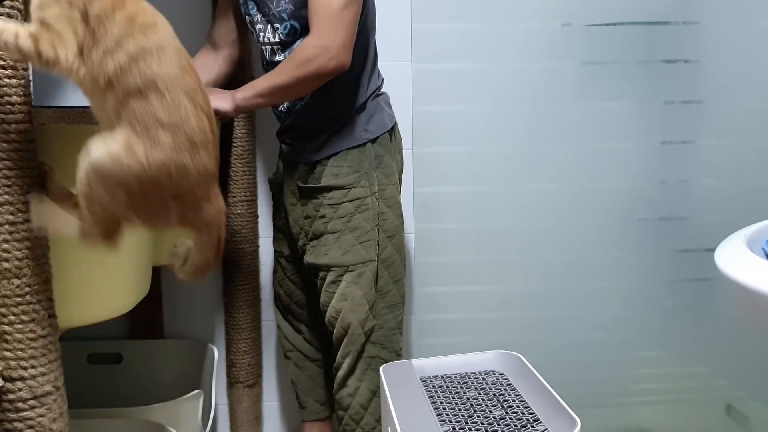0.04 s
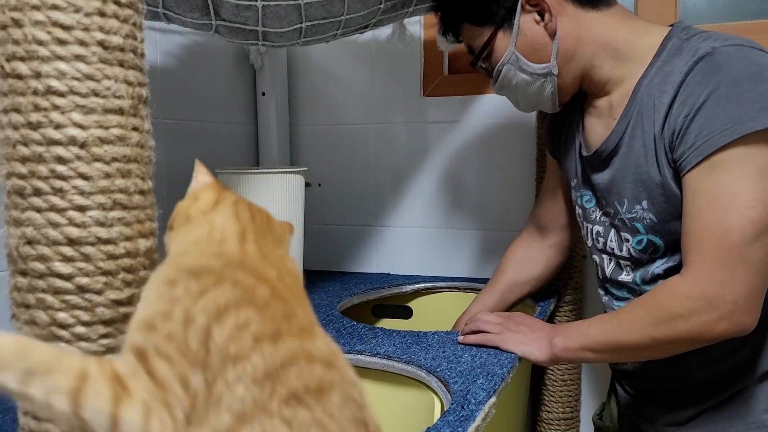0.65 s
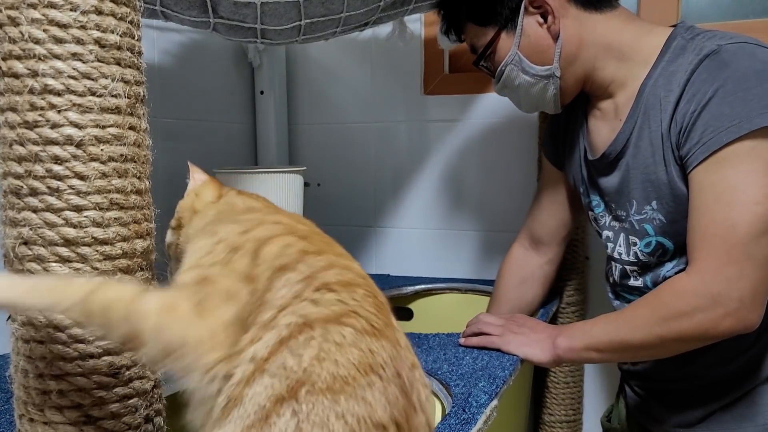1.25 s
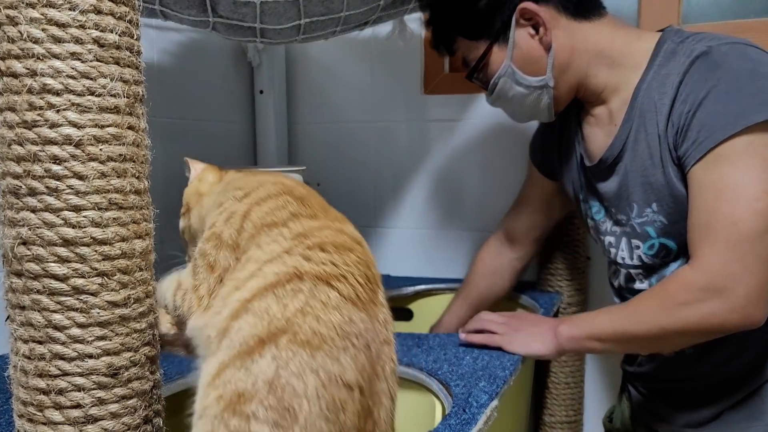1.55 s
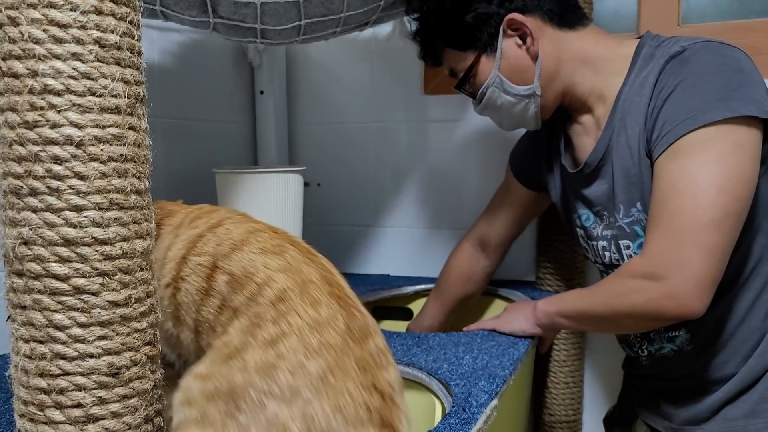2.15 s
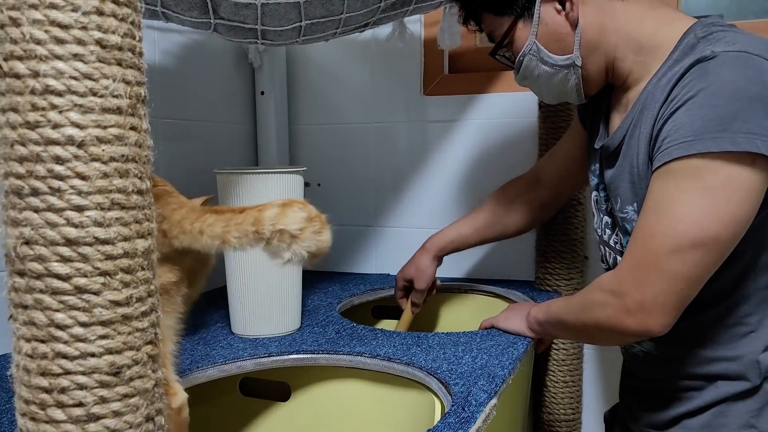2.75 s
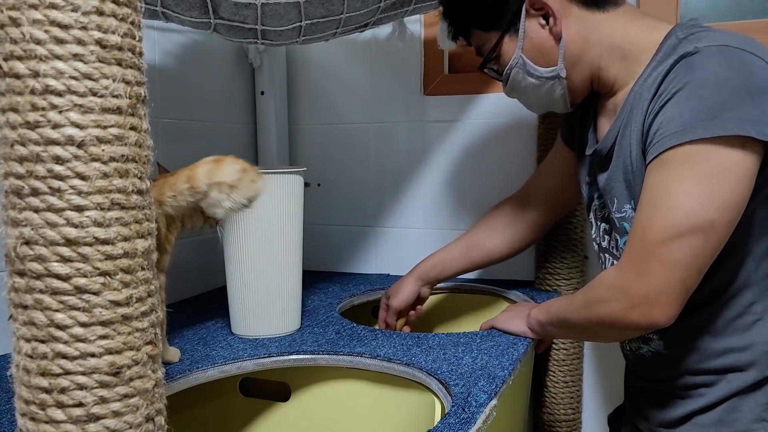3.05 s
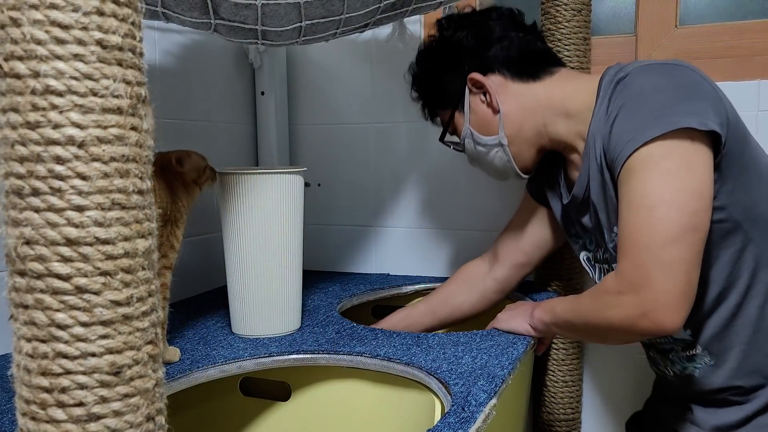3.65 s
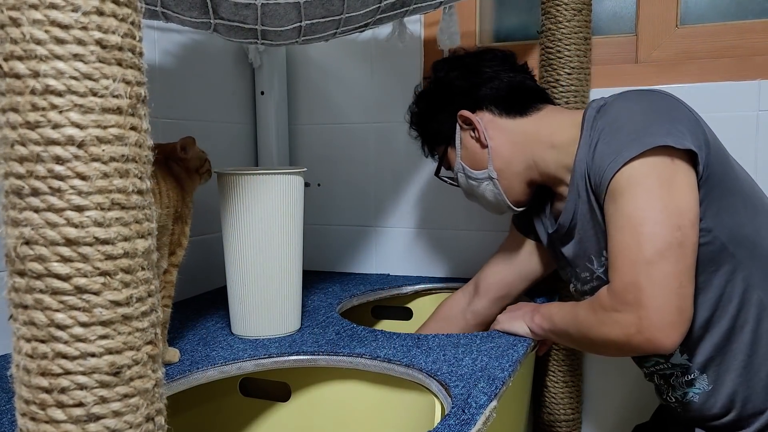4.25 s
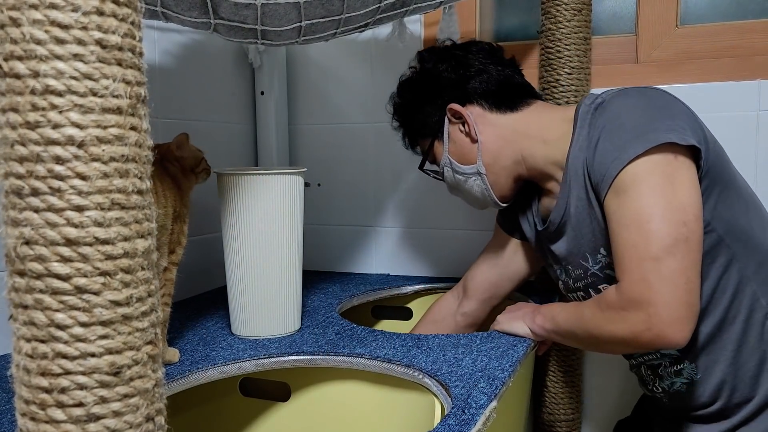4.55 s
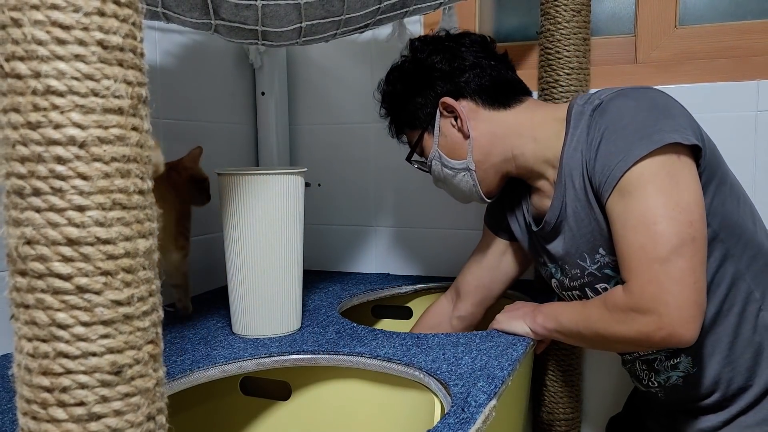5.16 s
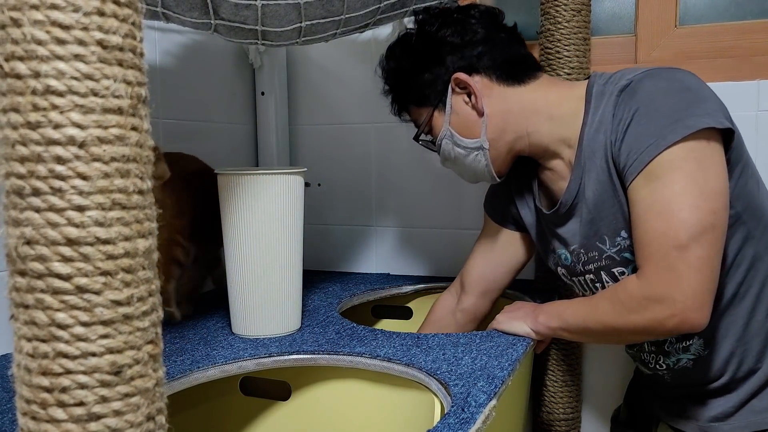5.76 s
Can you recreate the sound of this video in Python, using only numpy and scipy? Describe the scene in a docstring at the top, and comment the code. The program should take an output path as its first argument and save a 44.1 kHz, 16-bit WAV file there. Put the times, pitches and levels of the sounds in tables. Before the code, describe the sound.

Claws snag on rope and paws thump, followed by hollow plastic knocks and gritty litter scooping in a small tiled room.

```python
"""Scooping the litter box in a cat tree

A small tiled room, heard from nearby on a stereo pair. A scoop knocks the hollow plastic box,
sifts a trickle of litter that rings its ribs, then ploughs through the crunching grains.
Meanwhile a cat climbs the rope post, claws snapping the fibres, and thumps on to the shelf.
Quiet household air noise lies underneath."""
import sys
import numpy as np
from scipy import signal
from scipy.fft import rfft, irfft, next_fast_len
from scipy.io import wavfile
from scipy.ndimage import uniform_filter1d

SR = 44100
rng = np.random.default_rng(int(sys.argv[2]) if len(sys.argv) > 2 else 0)


def master_out(mix):
    """Clip the mix to full scale and print it as 16-bit PCM to the path in sys.argv[1]."""
    frames = np.transpose(np.atleast_2d(mix))
    ceiling = np.clip(frames, -1, 1)
    pcm = np.round(ceiling * 32767).astype(np.int16)
    wavfile.write(sys.argv[1], SR, pcm)


N = 259749
TIME = np.arange(N) / SR

# claws catching in the rope: start_s, rise_s, level_db, snap_db (fibres, over that level)
CLAWS = [(.026, 0.01, -42, -30), (0.065, 0.0038, -58, 15.5), (.141, .002, -54, -18),
         (.166, 0.0027, -45.5, -14), (.206, 0.00042, -39, -8.5), (.306, 0.0014, -43, -7.5),
         (0.451, 0.0013, -49, -11), (.553, 0.0024, -54, 6), (0.657, .006, -53, -10),
         (0.737, 0.0012, -44, -9.5), (0.919, .001, -52.5, -8.5), (1.197, 0.0034, -56.5, 6.5),
         (1.326, 0.0022, -52, -21), (1.354, 0.003, -45, -7.5), (1.561, 0.012, -54.5, -0.5),
         (1.7155, 0.00074, -48.5, -5.5)]


def box_knocks():
    """Scoop and arm strike the plastic box, and its panels rattle and ring."""
    # start_s, rise_s, level_db, thump_db (over that level), softness_db, pitch_hz of the spot struck
    knocks = [(1.2495, 0.0013, -20.5, -7, 5.5, 437), (1.255, 0.0017, -15, -8.5, 12.5, 338),
              (1.328, 0.0091, -36.5, -2, 30, 440), (1.978, 0.0029, -36, 0.5, 22, 740),
              (2.012, 0.0021, -39.5, 0.5, 30, 480), (2.196, 0.017, -28, 1, 14, 1040),
              (2.312, 0.0087, -35, -2.5, 9, 1010), (2.513, 0.0018, -32, -2, 5.5, 690),
              (3.684, 0.0027, -40.5, -26, 4, 1400), (3.760, 0.0053, -44, -1, -1, 330),
              (4.632, 0.0005, -55.5, -19, 3, 1740), (4.804, 0.00054, -51.5, -15, 3.5, 2900),
              (4.874, 0.0017, -38, -11, 9, 645), (4.883, 0.0011, -40, -2, 4.5, 1150),
              (4.958, 0.0013, -60, -1, 2.5, 2900), (5.05, 0.0015, -47.5, -5, 11.5, 684),
              (5.544, 0.00055, -45.5, -12, 13.5, 630)]
    # modes of the box: pitch_hz, level_db, t60_s
    box_modes = [(113.8, -1.5, 0.34), (149.6, -6.5, 0.31), (166.5, -9, 0.096), (284.9, -1, 0.171),
                 (394, -11.5, 0.33), (432, -2.5, 0.13), (455, -9.5, 0.32), (580, -12.5, 0.25),
                 (837, -11, 0.18), (1062, -14, 0.21), (1150, -11.5, 0.1), (1214, -12, 0.078),
                 (1577, -18, 0.17), (1730, -19.5, 0.19), (2310, -22, 0.17)]
    # spectrum of its rattle: frequency_hz, level_db
    box_colour = [(21, -54), (35, -23), (107, -14.5), (225, -11), (290, 2), (347, -3), (437, -8),
                  (522, -8.5), (593, -4.5), (915, -19), (1450, -15), (2700, -27), (3810, -43.5),
                  (11100, -59), (15500, -70)]
    return blows(contacts(knocks, t60=0.2), box_modes, box_colour, edges_hz=[30, 200, 1000, 4000, 16000],
                 ring_db=-1, grit=0.052, bass_lag_s=0.011, tail_db=-16, tail_t60=0.52,
                 bass_tilt=4.7, ragged=0.66, spot_db=-1, spot_q=3.2, crack_db=0.5)


def ploughing():
    """The scoop shoves through the litter in small slips: grains crunch, clumps crack, the box drums."""
    # the long stroke: time_s, effort_db
    stroke = [(3.18, -82.5), (3.368, -51.5), (3.434, -40.5), (3.498, -55.5), (3.564, -44), (3.64, -49),
              (3.696, -47.5), (3.746, -51), (3.766, -44), (3.866, -56.5), (3.948, -49), (4.002, -55),
              (4.064, -49), (4.196, -48.5), (4.23, -44.5), (4.288, -48.5), (4.32, -59.5), (4.37, -62)]
    # light shoves: peak_s, effort_db, length_s
    shoves = [(4.885, -49.5, 0.11), (5.762, -58, 0.11), (5.835, -60, 0.12)]
    # clumps breaking against the scoop: peak_s, effort_db
    crunches = [(3.385, -47), (3.41, -44), (3.441, -45), (3.537, -46), (3.6, -51), (3.646, -50),
                (3.687, -51), (3.757, -41), (3.784, -42.5), (3.911, -50.5), (3.985, -53), (4.08, -52),
                (4.23, -41.5), (4.264, -42)]
    # spectrum of the litter: frequency_hz, level_db
    litter_colour = [(40, -33), (105, -7.5), (200, -14.5), (330, -4), (450, -14), (750, -10), (1050, -18.5),
                     (1600, -21.5), (2200, -23), (3000, -23.5), (6000, -32.5), (9000, -35.5), (15500, -48)]
    # resonances of the filled box: pitch_hz, width_hz, level_db
    hollow = [(290, 7.8, 9.5), (343, 8.1, -1), (770, 38, -13), (1256, 170, -17.5)]
    usual_effort_db, sink_db = -45, 6.5
    crunch = grains(N, rate=1400, spread_db=2.5) * undb(1.5 * walk(55))
    clumps = undb(-10.5) * grains(N, rate=55, spread_db=1.3)
    travel = np.interp(TIME, (stroke[0][0], stroke[-1][0]), (0, 1))
    litter = travelling(crunch + clumps, travel, t60=0.033, share=0.78, from_hz=1130, count=15)
    litter = colour(litter, litter_colour)
    push = curve(stroke) + sum(swell(s, db, length, length) for s, db, length in shoves)
    breaking = sum(swell(s, db, rise_s=0.0044, fall_s=0.02) for s, db in crunches)
    effort = np.hypot(push, breaking) / undb(usual_effort_db)
    depth = undb(sink_db * (travel - .5))  # the deeper the scoop, the more body and the less hiss
    body = undb(-47.5) * effort ** 0.62 * depth
    skim = undb(-62.5) * held(3.168, 4.30, edge_s=0.0052)  # loose top grains slide over the scoop
    hiss = np.hypot(undb(-58.5) * effort, skim) / depth
    # the scoop bears on the box floor, then rides up on the litter
    bearing = np.maximum(held(3, 3.83, edge_s=0.028), undb(-5.5))
    drum = undb(-42.5) * effort ** 0.95 * bearing
    below_1k, below_4k = (signal.sosfiltfilt(signal.butter(3, hz, fs=SR, output="sos"), litter)
                          for hz in (1000, 4000))
    out = floor_bumps() + drum * unit(resonate(crunch, hollow))
    layers = [(below_1k, body), (below_4k - below_1k, undb(-50) * effort), (litter - below_4k, hiss)]
    for part, gain in layers:
        surge = undb(-0.2 * walk(23.87))  # fine and coarse grains give way at different moments
        out += gain * surge * part / part.mean(0).std()
    return out


def floor_bumps():
    """The scoop bumps low hollow notes from the box floor, quickly damped by the litter on it."""
    # start_s, pitch_hz, level_db
    bumps = [(3.435, 300, -30), (3.554, 324, -33.5), (3.682, 296.4, -26.5), (3.69, 341, -32.5),
             (3.757, 350, -31), (3.796, 328, -31), (4.305, 286, -36.5)]
    rise_s = 0.0057
    out = np.zeros(N)
    for start, hz, db in bumps:
        t = np.maximum(TIME - start, 0)
        note = np.sqrt(2) * np.sin(2 * np.pi * (hz * t + rng.random()))
        out += undb(db) * note * onset(t, rise_s) * fade(t, t60=0.18)
    return out


def sifting():
    """Fine grains spurt through the slots; now one rib of the scoop rings, now another."""
    # tips and dips that let litter run through: peak_s, flow_db, length_s
    pours = [(2.31, -66, 0.13), (2.54, -44, 0.18), (2.726, -67, 0.095), (2.961, -68, 0.082),
             (3.08, -68.5, 0.055), (3.17, -62, 0.018), (3.263, -63, 0.11), (4.033, -49, 0.031),
             (4.888, -52, 0.022)]
    # modes of the scoop: pitch_hz, width_hz, level_db
    scoop_modes = [(2614, 21, 3), (3020, 30, -7.5), (3590, 25, 1), (3830, 17, 1), (4530, 18, 1),
                   (4720, 26, -2), (5690, 38, -3), (5960, 36, -3), (6900, 30, -9)]
    # spectrum of the trickle: frequency_hz, level_db
    sift_colour = [(900, -6), (2000, -13.5), (3800, -11.5), (6000, -2.5), (9000, -5.5), (12000, -6),
                   (15500, -16)]
    lift_s = (2.43, 2.87)
    flow = sum(swell(s, db, 0.61 * length, length) for s, db, length in pours)
    spurts = undb(2.1 * walk(45.74))
    stream = grains(N, rate=5000, spread_db=2.5) * flow * spurts
    tilt = np.interp(TIME, lift_s, (0, 1))  # the scoop tilts as it lifts, changing its reflections
    hiss = colour(travelling(stream, tilt, t60=0.09, share=0.75, from_hz=2600, count=5), sift_colour)
    ribs = sum(resonate(stream * undb(6.5 * walk(18)), [mode]) for mode in scoop_modes)
    return undb(5.5) * (hiss + undb(6) * ribs)


def cat_climbing():
    """Paws thump on the shelf; claws snap the rope fibres, and little of that reaches the shelf."""
    # start_s, rise_s, level_db, thump_db (over that level), softness_db, pitch_hz of the spot struck
    paws = [(.014, 0.0035, -42.5, -6.5, 5.5, 794), (0.075, 0.011, -63, 13.5, 18, 229),
            (.207, 0.0044, -32.5, -33, 7, 680), (.230, 0.001, -41, -12, 3, 710),
            (.322, 0.012, -40.5, -8, 3.5, 1500), (.345, 0.0025, -40, -6.5, 6, 418),
            (.402, 0.0024, -50, -8, 6.5, 810), (.513, 0.0017, -43, -13, 8.5, 600),
            (.836, 0.0031, -39.5, -5, 10.5, 514), (1.718, 0.0051, -49.5, -24, 7, 394),
            (5.315, 0.0089, -57.5, 11, 6, 325)]
    # modes of the shelf: pitch_hz, level_db, t60_s
    shelf_modes = [(62.5, -3, 0.79), (113, -8, 0.61), (242.6, 1.5, 0.18), (404, -3.5, 0.39),
                   (448, -5, 0.14), (505, -4, 0.22), (680, 3, 0.32), (788, -1, 0.29), (1400, -23, 0.17),
                   (2974, -15.5, 0.074), (3230, -16, 0.17)]
    # spectrum of its rattle: frequency_hz, level_db
    shelf_colour = [(35, -40), (90, 15.5), (160, -5), (250, 6.5), (450, 4), (740, 2.5), (950, -5),
                    (1300, -2), (2100, -17.5), (3200, -15.5), (4000, -20.5), (6500, -20.5), (15500, -32.5)]
    rasp_hz, claw_t60, tear_s_per_db = 2770, 0.19, 0.0042
    hits = contacts(paws, t60=0.34)
    for start, rise, db, snap in CLAWS:
        t60 = claw_t60 + tear_s_per_db * max(snap, 0)  # a bright snap tears on for longer
        hits.append((start, rise, t60, rasp_hz, db - 13, db - 9, db, db + snap))
    return blows(hits, shelf_modes, shelf_colour, edges_hz=[30, 200, 2000, 3900, 16000],
                 ring_db=-5, grit=0.23, bass_lag_s=0.0047, tail_db=-18.5, tail_t60=0.31,
                 bass_tilt=0.073, ragged=0.21, spot_db=6, spot_q=5.9, crack_db=1)


def rope_brushing():
    """Fur swishes along the rope, and each claw drags through the fibres until they let go."""
    # spectrum of the rubbing: frequency_hz, level_db
    fur_colour = [(1500, 0), (4000, -0.5), (8000, -1.5), (11500, 1), (15500, -7)]
    swish = swell(peak_s=1.058, db=-55, rise_s=0.11, fall_s=0.11)
    drag = sum(swell(start + rise, min(db + snap - 1.5, -63), rise_s=0.12, fall_s=0.012)
               for start, rise, db, snap in CLAWS)
    return unit(colour(grains(N, rate=6900, spread_db=3.9), fur_colour)) * (swish + drag)


def contacts(rows, t60):
    """Blunt hits for blows(): the softer the contact, the less clack and, faster still, the less tick."""
    return [(start, rise, t60, hz, db + thump, db, db - soft, db - 2.75 * soft)
            for start, rise, db, thump, soft, hz in rows]


def blows(hits, modes, spectrum, edges_hz, ring_db, grit, bass_lag_s, tail_db, tail_t60,
          bass_tilt, ragged, spot_db, spot_q, crack_db):
    """Each blow rattles the panels, rings their modes and a wash of higher ones, and dies in the room."""
    size = SR * 3 // 4
    t = np.arange(size) / SR
    out = np.zeros((2, N + size))
    for start, rise, t60, spot_hz, *levels_db in hits:  # four bands: thump, body, clack, tick
        thump_db, body_db = levels_db[:2]
        ring = 0
        for hz, db, mode_t60 in modes:
            # a soft, heavy push favours the deepest modes
            weight_db = bass_tilt * (body_db - thump_db + 2.5) * np.log2(np.clip(hz / 200, .56, 1))
            # short waves reach the two microphones out of step
            skew = min((hz / 480) ** 2, 1.55) * np.array([[-.5], [.5]])
            detuned_hz = hz * (1 + 0.0067 * rng.standard_normal())
            phase = 2 * np.pi * (detuned_hz * t + rng.random())
            ring += undb(db + weight_db) * np.sin(phase + skew) * fade(t, mode_t60)
        rattle = np.sqrt(1 - grit) * noise(size) + np.sqrt(grit) * grains(size, rate=1200, spread_db=9.3)
        wash = unit(colour(cavity(rattle, t60=0.056, share=ragged, from_hz=1100), spectrum))
        decay = fade(t, t60) + undb(tail_db) * fade(t, tail_t60) + undb(crack_db) * fade(t, 0.022)
        sound = undb(ring_db) * ring + wash * decay
        # the spot struck brings out the modes near its own pitch
        sound += resonate(sound, [(spot_hz, spot_hz / spot_q, spot_db)])
        first = int(start * SR)
        for k, db in enumerate(levels_db):
            attack = onset(t, rise + bass_lag_s * (k == 0))  # the heavy low modes build up later
            part = band(sound * attack, edges_hz[k], edges_hz[k + 1])
            peak = np.sqrt(uniform_filter1d(part.mean(0) ** 2, size=700).max())
            out[:, first:first + size] += part * undb(db) / peak
    return out[:, :N]


def cavity(x, t60, share, from_hz):
    """Quick reflections between nearby panels give the upper range a steady, ragged colour."""
    t = np.arange(SR // 25) / SR
    echoes = band(rng.standard_normal(len(t)) * fade(t, t60), from_hz, 14000)
    response = np.sqrt(share) * echoes / np.sqrt(np.sum(echoes ** 2))
    response[0] += np.sqrt(1 - share)
    # the reflections make fine ridges but favour no broad band
    ridges = rfft(response, 2 * len(t))
    ridges /= np.sqrt(uniform_filter1d(np.abs(ridges) ** 2, size=50))
    return signal.fftconvolve(x, irfft(ridges)[None, :len(t)], axes=1)[:, :x.shape[1]]


def travelling(x, travel, t60, share, from_hz, count):
    """Reflections change as the scoop travels (0-1) past count places in or above the box."""
    out = 0
    for place in range(count):
        nearness = np.maximum(1 - np.abs(travel * (count - 1) - place), 0)
        out += cavity(x * np.sqrt(nearness), t60, share, from_hz)
    return out


def tiled_room(x, wet_db, t60):
    """Close tiled walls return a short bright tail."""
    t = np.arange(SR // 2) / SR
    tail = band(rng.standard_normal((2, len(t))), 275, 9400) * fade(t, t60) * (t > .004)
    tail /= np.sqrt(np.sum(tail ** 2, axis=1, keepdims=True))
    return x + undb(wet_db) * signal.fftconvolve(x, tail, axes=1)[:, :N]


def room_tone():
    """Quiet household air noise, booming a little in the room's low modes."""
    # spectrum of the air noise: frequency_hz, level_db
    air_colour = [(15, -56), (25, -12.5), (96, -7.5), (169, -4.5), (260, -10.5), (368, -10.5), (582, -16.5),
                  (684, -16), (804, -17.5), (1020, -21), (1620, -20), (2170, -27), (3260, -28),
                  (9000, -46.5), (15500, -44.5)]
    # its slow drift: time_s, relative_db
    drift = [(0, -44), (1.1, -53.5), (5.89, -51)]
    air = unit(colour(noise(N), air_colour))
    boom = unit(resonate(noise(N), [(181, 2.9, -3), (233.7, 6.5, -3.5)]))
    return (air + undb(-2.5) * boom) * curve(drift) * undb(-5.5 + 0.11 * walk(13))


def widen(pair):
    """Two unrelated signals to left and right: the bass is shared, the rest arrives from all walls."""
    # stereo width: frequency_hz, side_minus_mid_db
    width = [(60, -3.5), (150, -15), (300, -2), (650, 3), (1400, 3), (3000, -0.5), (15000, 0.5)]
    side = colour(pair[1], width)
    return np.array([pair[0] + side, pair[0] - side])


def noise(size):
    """Diffuse stereo noise."""
    return widen(rng.standard_normal((2, size)))


def grains(size, rate, spread_db):
    """Tiny random clicks in stereo, a few much larger than the rest."""
    hit = rng.random((2, size)) < rate / SR
    strength = undb(spread_db * np.minimum(rng.exponential(size=(2, size)), 4))
    return widen(unit(hit * strength * rng.choice([-1, 1], (2, size))))


def walk(rate):
    """Smooth random wander, rate steps a second."""
    step = int(SR / rate)
    stairs = np.repeat(rng.standard_normal(N // step + 1), step)
    return 0.85 * uniform_filter1d(uniform_filter1d(stairs, step), step)[:N]


def undb(db):
    """Decibels to gain."""
    return 10 ** (np.asarray(db) / 20)


def unit(x):
    """Scale to rms 1."""
    return x / np.sqrt(np.mean(x ** 2))


def onset(t, rise_s):
    """Smooth rise from 0 to 1."""
    return 1 - np.exp(-(t / max(rise_s, .0005)) ** 2)


def fade(t, t60):
    """Ring-down of 60 dB in t60 seconds."""
    return np.exp(-np.log(1000) * t / t60)


def swell(peak_s, db, rise_s, fall_s):
    """Gain that climbs 20 dB in rise_s to its peak and loses 20 dB every fall_s after it."""
    return undb(db - 20 * np.maximum((peak_s - TIME) / rise_s, (TIME - peak_s) / fall_s))


def held(start_s, end_s, edge_s):
    """Gain 1 during a span, with sloping edges."""
    return np.clip(.5 + np.minimum(TIME - start_s, end_s - TIME) / edge_s, 0, 1)


def curve(rows):
    """Gain along (time_s, level_db) points, silent outside them."""
    return undb(np.interp(TIME, *np.transpose(rows), left=-np.inf, right=-np.inf))


def colour(x, points):
    """Shape a spectrum by (frequency_hz, level_db) points."""
    hz, db = np.transpose(points)
    size = next_fast_len(x.shape[-1])
    bins_hz = np.maximum(np.arange(size // 2 + 1) * SR / size, 1)
    gain = undb(np.interp(np.log(bins_hz), np.log(hz), db))
    return irfft(rfft(x, size) * gain, size)[..., :x.shape[-1]]


def band(x, lo_hz, hi_hz):
    """Causal band-pass."""
    return signal.sosfilt(signal.butter(3, [lo_hz, hi_hz], "band", fs=SR, output="sos"), x)


def resonate(x, peaks):
    """Sum of (pitch_hz, width_hz, level_db) resonances."""
    return sum(undb(db) * signal.lfilter(*signal.iirpeak(hz, hz / width, fs=SR), x)
               for hz, width, db in peaks)


def scene():
    """Box, cat and litter in the room; the blows carry their own tails."""
    impacts = box_knocks() + cat_climbing()
    rustle = ploughing() + sifting() + rope_brushing()
    return impacts + tiled_room(rustle, wet_db=-7, t60=0.17) + room_tone()


def record(dry):
    """The bass leans left, an edit cut silences the sound for an instant, and the top is cut."""
    # balance: frequency_hz, left_minus_right_db
    lean = [(120, 2.5), (500, 1.2), (3000, 1), (9000, 0.5)]
    top_hz = 15450
    edit_gap = 1 - .97 * uniform_filter1d(1. * ((TIME > .184) & (TIME < .204)), size=60)
    left = colour(dry[0], [(hz, db / 2) for hz, db in lean])
    right = colour(dry[1], [(hz, -db / 2) for hz, db in lean])
    top_cut = signal.ellip(10, .2, 80, top_hz, fs=SR, output="sos")
    return signal.sosfilt(top_cut, np.array([left, right]) * edit_gap)


dry = scene()
out = record(dry)
master_out(out)
```